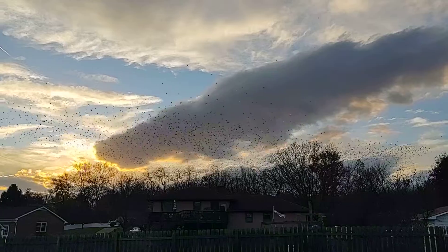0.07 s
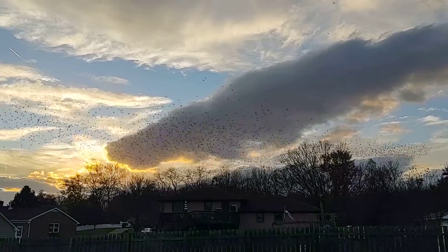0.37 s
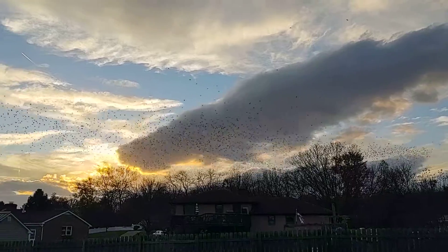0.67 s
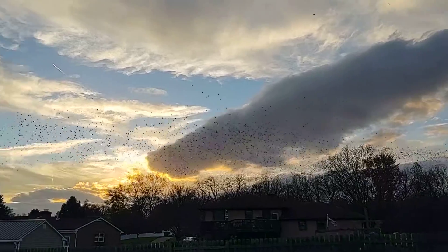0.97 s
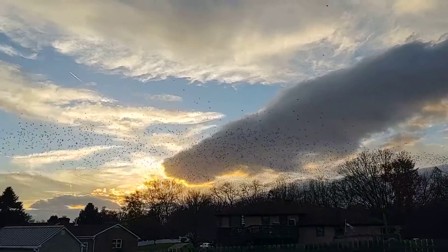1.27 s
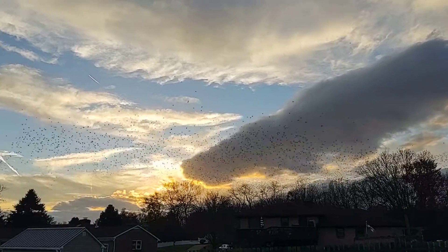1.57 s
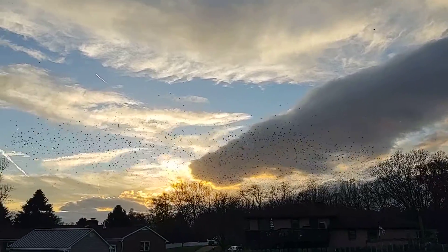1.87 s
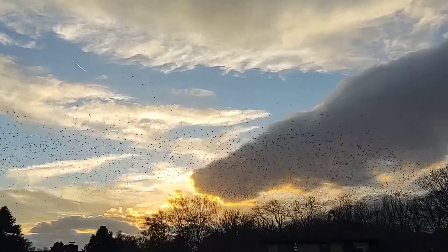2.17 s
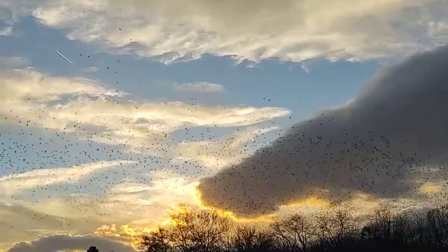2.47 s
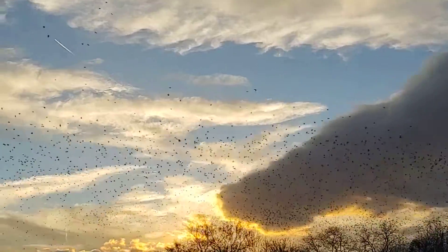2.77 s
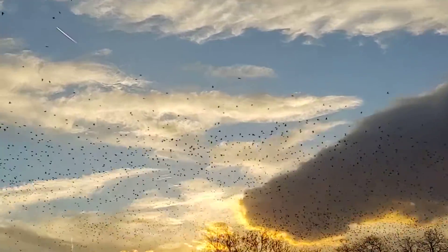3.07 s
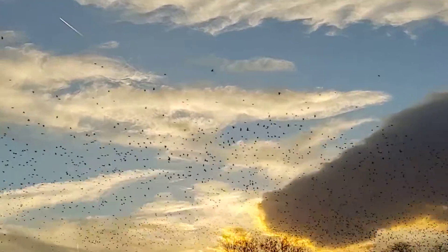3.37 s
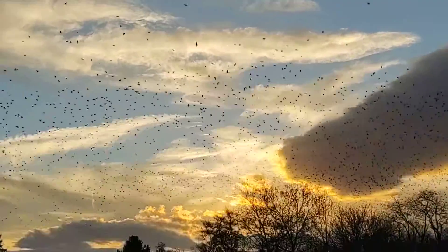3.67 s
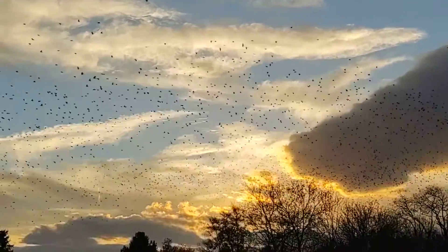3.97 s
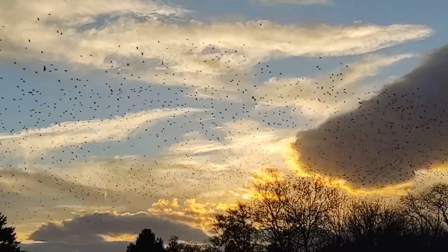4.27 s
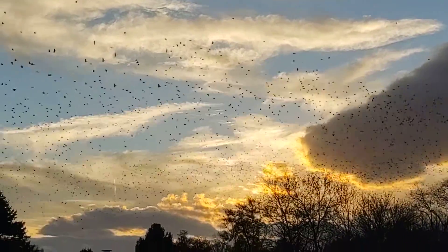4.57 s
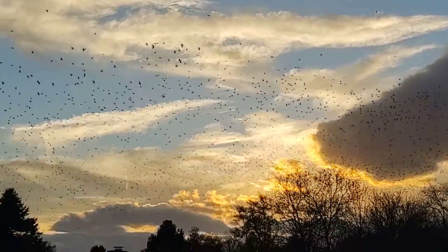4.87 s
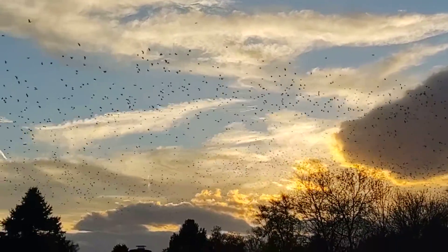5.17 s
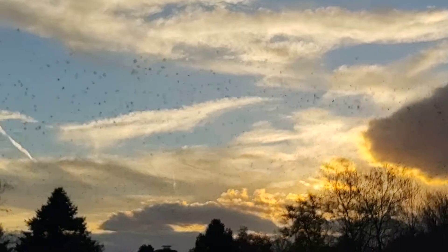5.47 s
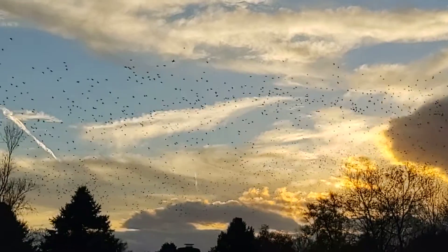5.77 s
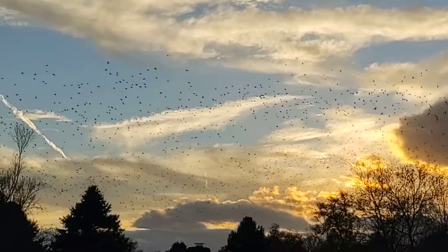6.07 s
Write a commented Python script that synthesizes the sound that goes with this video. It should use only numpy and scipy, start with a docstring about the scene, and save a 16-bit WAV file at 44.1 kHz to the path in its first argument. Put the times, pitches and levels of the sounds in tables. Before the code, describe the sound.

A huge flock of blackbirds chatters and rushes overhead, with a few whistles, faint traffic and a finger bumping the microphone early on.

```python
"""A huge flock of blackbirds calls and rushes over a quiet suburb at dusk, above far traffic, machine hum and
faint hiss. The flock, traffic and hiss swell, then settle. In the first second a finger bumps and rubs a
phone's right microphone opening. The case ticks, mostly in the first 1.3 seconds, with faint knocks and
crackles later. At 1.5 seconds the hand cups the opening and the nearest bird whistles; other birds whistle and
rasp here and there. Around 4 seconds a far vehicle passes, and soon after it one bird squeals."""
import sys
import numpy as np
from scipy import signal
from scipy.fft import rfft, irfft, next_fast_len
from scipy.io import wavfile
from scipy.ndimage import map_coordinates

SR = 44100
rng = np.random.default_rng(int(sys.argv[2]) if len(sys.argv) > 2 else 0)


def bounce(signal):
    """Save signal as a 16-bit WAV file at the path given by the first command-line argument."""
    frames = np.transpose(np.atleast_2d(signal))
    limited = np.clip(frames, -1, 1)
    pcm = np.round(limited * 32767).astype(np.int16)
    wavfile.write(sys.argv[1], SR, pcm)


N = 274302

# Tone colours of the noises. Each row: frequency in Hz, relative level in dB.
FLOCK_COLOUR = [(500, -22.5), (1000, -11), (1500, -9), (2100, -3.5), (3100, 1.5), (3700, -4), (4600, -7),
                (5900, -7), (7200, -13.5), (9000, -20.5), (12000, -35), (16000, -44.5)]
SKIN_DRAG_COLOUR = [(25, -50), (60, -4), (130, -0.5), (300, -3), (600, -2.5), (850, -6), (1200, -13),
                    (1700, -10.5), (2500, -11), (6000, -30.5)]
SKIN_HISS_COLOUR = [(25, -31.5), (300, -9), (1200, -7), (2000, 0), (2800, 6.5), (4000, 2), (5200, 0.5),
                    (7500, 4), (10000, 0), (13000, -0.5), (16000, -13)]
SCUFF_COLOUR = [(200, 0), (1400, -0.5), (3000, -7), (14000, -25.5)]
BRUSH_COLOUR = [(200, 3.0), (1000, -1.5), (3000, 6.5), (6000, 2.5), (9000, -4.0), (15000, -8.5)]
TRAFFIC_COLOUR = [(25, -38), (50, -9.5), (80, -2.5), (130, -1), (280, -1.5), (430, -7), (580, -8),
                  (760, -12), (1000, -12.5), (1800, -14.5), (5000, -41)]
MIC_HISS_COLOUR = [(25, -22), (1000, 8.5), (8000, -2.5), (15000, 2), (16000, -11)]
# Where the flock sits. Each row: frequency in Hz, left minus right in dB.
FLOCK_SIDE = [(800, -13), (1600, -5), (3000, -9), (4800, -10), (6500, -2), (10000, -5)]
# The nearest bird's call. Each row: time in seconds, pitch in Hz, relative level in dB.
NEAREST_CALL = [(1.398, 6140, -54), (1.408, 5946, -58.5), (1.416, 6326, -56), (1.426, 5900, -59),
                (1.432, 6350, -58), (1.478, 6151, -54), (1.486, 6006, -50), (1.498, 6140, -50),
                (1.508, 6730, -44), (1.516, 6564, -49), (1.524, 6435, -56)]
# Whistles further off. Each row: middle and length in seconds, pitch in Hz (sung 2% lower),
# slide in octaves per second, relative level in dB.
BIRD_WHISTLES = [(0.903, .16, 7380, 1, -64), (2.021, .17, 3700, 1.5, -62), (3.09, .07, 6200, 1, -62),
                 (4.016, 0.13, 6130, 4, -63.5), (4.28, .14, 2000, -3, -66.5), (4.317, .18, 3100, -0.5, -63),
                 (4.36, 0.13, 3560, 0, -62.5)]
# A squeal's overtones. Each row: multiple of the base pitch, relative level in dB.
SQUEAL_OVERTONES = [(4, -0.5), (5, -7), (6, -21)]
# Harsh calls. Each row: middle and half length in seconds, pitch in Hz, relative level in dB.
BIRD_RASPS = [(1.674, 0.028, 2885, -60), (2.04, 0.081, 3705, -63), (2.361, 0.041, 2936, -59.5),
              (2.72, 0.08, 3010, -61.5), (3.381, .033, 5800, -62.5), (3.45, 0.074, 3100, -62),
              (3.63, 0.049, 3190, -59), (4.331, 0.12, 3140, -68.5), (4.774, 0.061, 3104, -62),
              (5.0, .08, 3105, -65), (5.235, .018, 3070, -65), (5.53, 0.041, 3220, -67)]
# Finger rubs. Each row: peak time, rise and fall in seconds, relative drag and hiss levels in dB.
FINGER_STROKES = [(0.193, 0.0098, 0.15, -46.5, -66), (0.274, 0.012, 0.028, -29.5, -38.5),
                  (0.346, 0.034, 0.023, -21, -24), (0.452, 0.068, 0.044, -32, -32.5),
                  (0.504, 0.049, 0.033, -33, -24.5), (0.658, 0.015, 0.01, -41, -44.5),
                  (0.707, 0.035, 0.042, -40.5, -37.5), (.803, 0.028, 0.022, -37, -37.5)]
# Sharp finger bumps. Each row: time in seconds, relative level in dB, main frequency in Hz.
FINGER_BUMPS = [(.2129, -20.5, 1390), (.2138, -19.5, 386), (.2661, -7, 260), (.2673, -11.5, 895),
                (0.3367, -18.5, 419.6), (0.3492, -8.5, 447), (0.3843, -20.5, 449.3), (.449, -22.5, 420)]
# The soft fingertip lands or lifts. Each row: time in seconds, relative level in dB.
FINGER_THUDS = [(.19, -39), (0.2721, -21.5), (.551, -31), (.66, -34), (0.686, -32.5), (.782, -31.5),
                (0.825, -29)]
# Ringing of the cupped hand. Each row: frequency and width in Hz, relative level in dB.
HAND_HOLLOW = [(260, 160, 1.5), (573, 130, 0), (1740, 310, 2.5), (2630, 144, 0), (3802, 130, 3),
               (5930, 1550, 1)]
# Case ticks. Each row: time in seconds, relative level in dB, fade in seconds, left minus right in dB.
CASE_TICKS = [(0.24, -48, .0011, 15), (0.386, -33, 0.0011, 5), (0.401, -35.5, 0.0037, 13.5),
              (0.63, -50, 0.0054, 12), (0.995, -49, 0.00088, -3), (1.098, -47.5, 0.012, -20),
              (1.19, -50.5, .004, 10), (1.133, -36, .009, -34), (1.282, -45.5, 0.0048, -23),
              (3.421, -56.5, 0.017, -19)]
# Small knocks of the case. Each row: start in seconds, relative level in dB.
CASE_KNOCKS = [(1.285, -56), (3.4159, -48.5), (3.664, -53.5), (5.595, -53)]
# The case's ring. Each row: frequency in Hz, relative level in dB, seconds to fade by 60 dB.
CASE_RING = [(535, -15, 0.019), (820, -2.5, 0.019), (1000, -1, 0.016), (1460, -1, 0.0064),
             (3000, 6, 0.0069), (4300, 8, 0.0055)]
# Shifts of the grip. Each row: rough middle and length in seconds, relative level in dB.
GRIP_SHIFTS = [(1.9, .8, -63), (3.63, .11, -57.5)]
# Hum of far machines. Each row: pitch in Hz, level in dB.
MACHINE_HUM = [(118.4, -76.5), (240, -80.5), (540, -89), (948, -86.5)]
# Swells of a far whine. Each row: middle and length in seconds, peak level in dB.
WHINE_SWELLS = [(2.402, 1.0, -78), (4.65, 1.0, -76.5)]

START_S = 0.14  # when the surroundings come in
TOP_HZ = 15850  # upper limit of the sound


def flock():
    """Raspy calls, short chips and wing noise merge into one rush that flutters in strength."""
    calls = chatter(centre_hz=3481, spread=.35, length_s=.04, glide=0.1488, rasp=.15, count=550)
    chips = chatter(centre_hz=3214, spread=.14, length_s=.022, glide=.14, rasp=0.18, count=480)
    rush = wings(beat_hz=16, depth_db=3.0, groups=4)
    flutter = amp(wobble(30))
    blend = coloured(rush + amp(-11.0) * calls, FLOCK_COLOUR) + amp(-12.5) * chips
    return unit(filtered(unit(flutter * blend), lambda hz: pan(along(FLOCK_SIDE, hz))))


def wings(beat_hz, depth_db, groups):
    """Groups of birds push puffs of air, each at its own drifting wingbeat."""
    rush = np.zeros((2, N))
    for rate in beat_hz * np.exp(.2 * rng.standard_normal(groups)):
        beat = np.sin(2 * np.pi * rate * clock() + 2 * wobble(1.88))
        rush += amp(depth_db * beat + 2.02 * wobble(5.07)) * rng.standard_normal((2, N))
    return unit(rush)


def chatter(centre_hz, spread, length_s, glide, rasp, count):
    """Hundreds of far calls, each a short sliding note of its own pitch, torn by a rough voice."""
    pitch, slope, stretch = rng.standard_normal((count, 3)).T[:, :, None]
    t = np.arange(SR // 12) / SR
    lengths = np.minimum(length_s * np.exp(.35 * stretch), t[-1])
    progress = np.minimum(t / lengths, 1)
    hz = np.minimum(centre_hz * np.exp(spread * pitch + glide * slope * (progress - .5)), TOP_HZ)
    phase = np.cumsum(2 * np.pi * hz / SR + rasp * rng.standard_normal(progress.shape), 1)
    notes = np.sin(np.pi * progress) * np.sin(phase)
    return unit(echoes(scatter(rng.integers(0, N, count), notes), fade_s=0.29))


def near_birds():
    """A few birds stand out of the flock; the trees answer faintly."""
    calls = nearest_bird() + sum(whistle(*row) for row in BIRD_WHISTLES) + squeal()
    return pan(-9.5) * (calls + amp(-8.5) * echoes(calls, fade_s=0.17))


def nearest_bird(boost_db=6, fade_s=0.0031):
    """A thin held whistle that ends in a loud upward flick."""
    hz, db = curves(NEAREST_CALL)
    start, end = NEAREST_CALL[0][0], NEAREST_CALL[-1][0]
    fade = np.clip(np.minimum(clock() - start, end - clock()) / fade_s, 0, 1)
    return bird_note(hz, fade * amp(db), [(1, boost_db)], rough=.022)


def whistle(middle, length, hz, glide, db):
    """A note that swells and fades as its pitch slides."""
    t = np.clip(clock() - middle, -length, length)
    return bird_note(hz * 2 ** (glide * t), amp(db) * arch(middle, length), [(0.98, 0)], rough=.024)


def squeal(middle_s=4.636, length_s=0.12, base_hz=1247, sway_hz=11.5):
    """A creaky note with a swaying pitch, heard only by its high overtones."""
    hz = base_hz * (1 + 0.019 * np.sin(2 * np.pi * sway_hz * (clock() - middle_s)))
    return bird_note(hz, amp(-59) * arch(middle_s, length_s), SQUEAL_OVERTONES, rough=0.0061)


def bird_note(hz, gain, overtones, rough):
    """One bird's voice: a whistle with a fast flutter of pitch and strength."""
    out = np.zeros(N)
    on = gain > 1e-9
    phase = 2 * np.pi * np.cumsum(hz[on] * (1 + rough * wobble(500, size=on.sum()))) / SR
    tone = sum(amp(db) * np.sin(multiple * phase) for multiple, db in overtones)
    out[on] = gain[on] * amp(1.9 * wobble(198, size=on.sum())) * tone
    return out


def harsh_calls(width_hz=520, boost_db=6.0, octaves_per_s=-.4):
    """Nearer birds rasp: a band of noise slides down with the voice."""
    out = np.zeros((2, N))
    noise = rng.standard_normal((2, N))
    grit = unit(filtered(noise, lambda hz: (hz < 2000) / np.hypot(1, hz / width_hz)))
    for middle, half_length, hz, db in BIRD_RASPS:
        on = abs(clock() - middle) < 3 * half_length
        t = clock()[on] - middle
        voice = np.sin(2 * np.pi * np.cumsum(hz * 2 ** (octaves_per_s * t)) / SR)
        out[:, on] += amp(db) * np.exp(-(t / half_length) ** 2) * voice * grit[:, on]
    return amp(boost_db) * pan(-9.0) * out


def finger_rubs(slip_db=1.0):
    """Skin drags over the right opening: a low scrape and a hiss, both catching on tiny slips."""
    drag, hiss = 0, 0
    for time, rise, fall, drag_db, hiss_db in FINGER_STROKES:
        stroke = hump(time, rise, fall)
        drag = np.hypot(drag, amp(drag_db) * stroke)
        hiss = np.hypot(hiss, amp(hiss_db) * stroke)
    slips = lambda: amp(slip_db * wobble(900)) * rng.standard_normal(N)
    scrape = drag * coloured(slips(), SKIN_DRAG_COLOUR)
    return pan(-68) * (scrape + hiss * coloured(slips(), SKIN_HISS_COLOUR))


def finger_bumps(thud_hz=111, scuff_db=-15.5, leak_hz=54.8):
    """Each bump presses air into the opening and lets go, with a scuff; slow pressure leaks away."""
    push, contact = np.zeros(N), np.zeros(N)
    thuds = [(time, db, thud_hz) for time, db in FINGER_THUDS]
    for time, db, hz in list(FINGER_BUMPS) + thuds:
        phase = 2 * np.pi * hz * (clock() - time)
        press = amp(db) * np.exp((1 - phase ** 2) / 2)
        push -= phase * press
        contact += press
    scuff = amp(scuff_db) * contact * coloured(rng.standard_normal(N), SCUFF_COLOUR)
    return pan(-75.5) * filtered(push + scuff, lambda hz: hz ** 2 / (hz ** 2 + leak_hz ** 2))


def cupped_hand(sound, loose=0.061, closest=0.91):
    """The hand closes and opens again; sound passing through its hollow rings at a few pitches."""
    def hollow(hz):
        return sum(amp(db) * 1j * hz * width / (centre ** 2 - hz ** 2 + 1j * hz * width)
                   for centre, width, db in HAND_HOLLOW)
    closed = loose + (closest - loose) * hump(1.5, rise_s=.42, fall_s=0.52)
    return (1 - 0.47 * closed) * sound + closed * filtered(sound, hollow)


def phone_case():
    """The case ticks and knocks as the grip shifts; a knock is a dry crack and a short ring."""
    out = np.zeros((2, N + SR))
    t = np.arange(SR // 10) / SR
    brush = coloured(rng.standard_normal(N), BRUSH_COLOUR)
    for time, db, fade_s, side_db in CASE_TICKS:
        out[:, :N] += pan(side_db) * amp(db - 2.5) * np.exp(-abs(clock() - time) / fade_s) * brush
    for time, db in CASE_KNOCKS:
        span = slice(round(time * SR), round(time * SR) + len(t))
        ring = sum(amp(level + rng.normal(0, 1.8) - 60 * t / fade_s) * np.sin(2 * np.pi * hz * t)
                   for hz, level, fade_s in CASE_RING)
        crack = amp(-12 - 60 * t / 0.013) * brush[span]
        out[:, span] += pan(-21) * amp(db) * (ring + crack)
    return out[:, :N]


def grip_crackle(count=8, fade_s=.0009, scatter_db=8):
    """Each shift of the grip lets off a few tiny bright ticks at random moments."""
    time, length, db = np.repeat(GRIP_SHIFTS, count, axis=0).T
    starts = ((time + length * rng.uniform(-0.63, 0.43, len(time))) * SR).astype(int)
    t = np.arange(SR // 100) / SR
    strength = amp(db + scatter_db * rng.standard_normal(len(time)))
    ticks = strength[:, None] * np.exp(-t / fade_s) * rng.standard_normal((len(time), len(t)))
    return pan(-27) * scatter(starts, ticks)


def traffic(swell_db):
    """Far traffic rumbles; one passing vehicle lifts it a little."""
    passing_db = 2 * hump(4.04, rise_s=0.83, fall_s=0.83)
    return amp(-68 + swell_db + passing_db) * coloured(rng.standard_normal((2, N)), TRAFFIC_COLOUR)


def machines(whine_hz=410):
    """Far machines hum, slightly unsteady, and a whine comes and goes."""
    def tone(hz):
        return np.array([unit(np.sin(2 * np.pi * hz * clock() + 0.66 * wobble(3.6))) for _ in range(2)])
    whine = sum(amp(db) * arch(middle, length) for middle, length, db in WHINE_SWELLS)
    return sum(amp(db) * tone(hz) for hz, db in MACHINE_HUM) + whine * tone(whine_hz)


def microphone_hiss(swell_db):
    """The microphones add a faint hiss of their own."""
    return amp(-77.6 + swell_db) * coloured(rng.standard_normal((2, N)), MIC_HISS_COLOUR) * pan(-1.97)


def echoes(sound, fade_s):
    """Sound bounces off trees and houses, differently for left and right."""
    t = np.arange(SR // 2) / SR
    tail = rng.standard_normal((2, len(t))) * amp(-60 * t / fade_s)
    return signal.fftconvolve(sound[None], tail / np.linalg.norm(tail[0]), axes=1)[:, :N]


def level_swell(settle_s, rise_s=0.18, hold_s=0.099):
    """The shape of the swell of flock, traffic and hiss: rise from 0 to 1, hold, then sink slowly back."""
    t = clock() - START_S
    return np.clip(t / rise_s, 0, 1) * np.exp(-np.maximum(t - rise_s - hold_s, 0) / settle_s)


def hump(peak_s, rise_s, fall_s):
    """A smooth rise to 1 and a smooth fall."""
    t = clock() - peak_s
    return np.exp(-(t / np.where(t < 0, rise_s, fall_s)) ** 2)


def arch(middle_s, length_s):
    """The upper half of a sine wave."""
    return np.cos(np.pi * np.clip((clock() - middle_s) / length_s, -.5, .5))


def amp(db):
    """Turn decibels into a multiplier."""
    return 10 ** (np.asarray(db) / 20)


def unit(x):
    """Scale to an average power of 1."""
    return x / np.sqrt(np.mean(x ** 2) + 1e-20)


def clock():
    """The time of every sample, in seconds."""
    return np.arange(N) / SR


def along(points, hz):
    """Read between a table's frequencies, with octaves evenly spaced."""
    known_hz, values = np.transpose(points)
    return np.interp(np.log(hz + 1), np.log(known_hz + 1), values)


def curves(rows):
    """One value per sample for each column after the time."""
    times, *columns = np.transpose(rows)
    return [np.interp(clock(), times, column) for column in columns]


def wobble(rate, size=N):
    """A smooth curve through `rate` random points a second."""
    points = rng.standard_normal(int(size * rate / SR) + 4)
    return map_coordinates(points, [np.arange(size) * rate / SR])


def filtered(x, response):
    """Turn each frequency up or down by response(hz)."""
    size = next_fast_len(N + SR // 2)
    return irfft(rfft(x, size) * response(np.fft.rfftfreq(size, 1 / SR)), size)[..., :N]


def coloured(x, colour):
    """Give a sound a tone colour, at an average power of 1."""
    return unit(filtered(x, lambda hz: amp(along(colour, hz))))


def pan(side_db):
    """Share power between left and right; below 0 dB leans right."""
    left = amp(np.atleast_1d(side_db))
    return np.array([left, np.ones_like(left)]) / np.sqrt(1 + left ** 2)


def scatter(starts, sounds):
    """Add up short sounds, each at its start sample."""
    where = starts[:, None] + np.arange(sounds.shape[1])
    return np.bincount(where.ravel(), sounds.ravel(), N)[:N]


def scene():
    """The surroundings, nearer birds and the hand on the phone; the flock, traffic and hiss swell and settle."""
    flock_db = -63 + 16.5 * level_swell(settle_s=1.127) + .5 * wobble(4.4)
    swell_db = 17 * level_swell(settle_s=0.92)
    far_sounds = cupped_hand(traffic(swell_db) + amp(flock_db) * flock())
    fade_in = np.clip((clock() - START_S) / 0.011, 0, 1)
    surroundings = fade_in * (far_sounds + microphone_hiss(swell_db) + machines())
    birds = harsh_calls() + near_birds()
    hand = finger_rubs() + finger_bumps() + phone_case() + grip_crackle()
    return surroundings + birds + hand


def record(dry):
    """The phone weakens the deep bass and cuts off the highest treble."""
    bass_cut = lambda hz: 1j * hz / (1j * hz + 40)
    treble_cut = lambda hz: np.sin(np.pi / 2 * np.clip((TOP_HZ - hz) / 500 + .5, 0, 1)) ** 2
    return filtered(dry, lambda hz: bass_cut(hz) * treble_cut(hz))


dry = scene()
out = record(dry)
bounce(out)
```